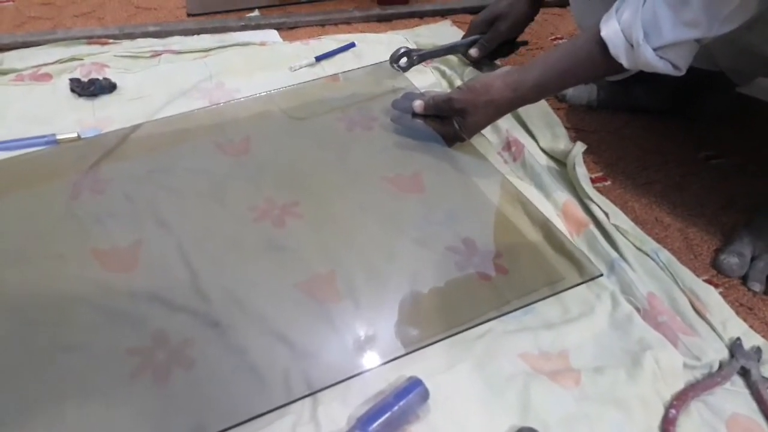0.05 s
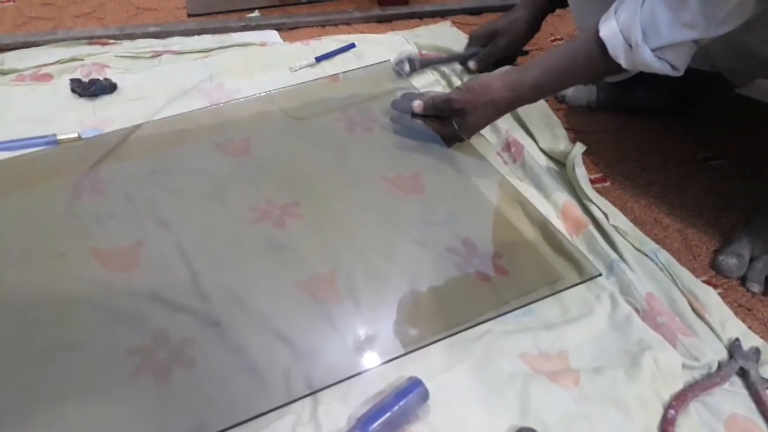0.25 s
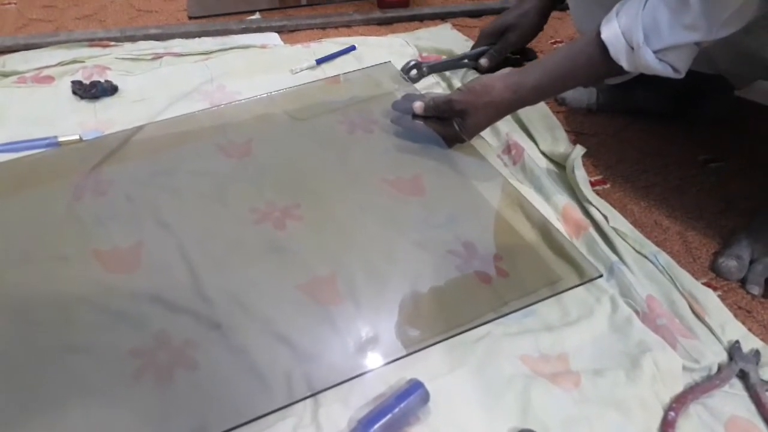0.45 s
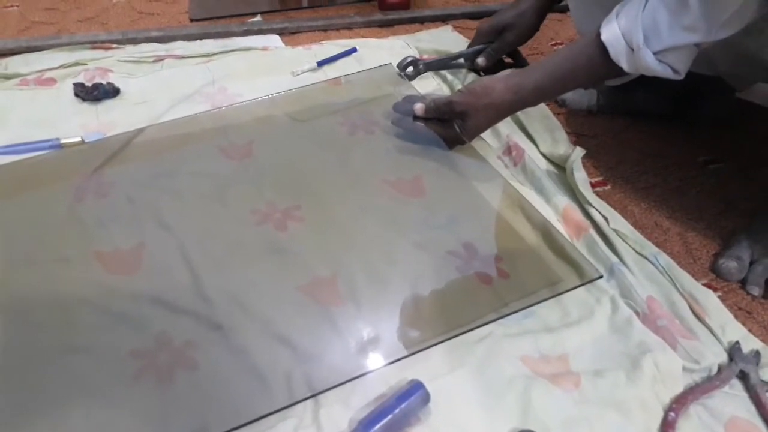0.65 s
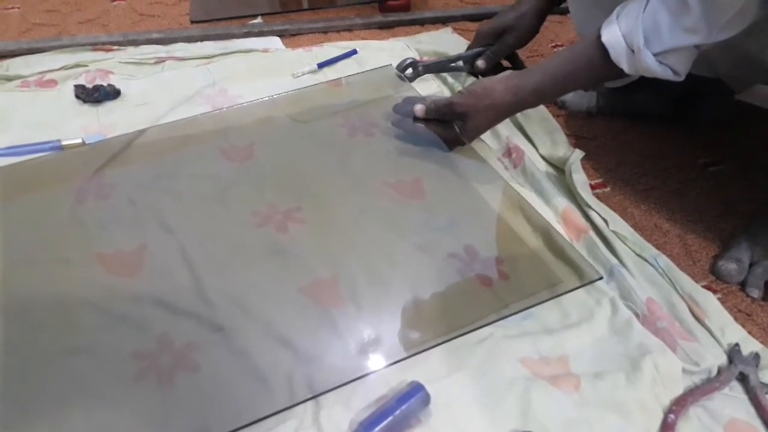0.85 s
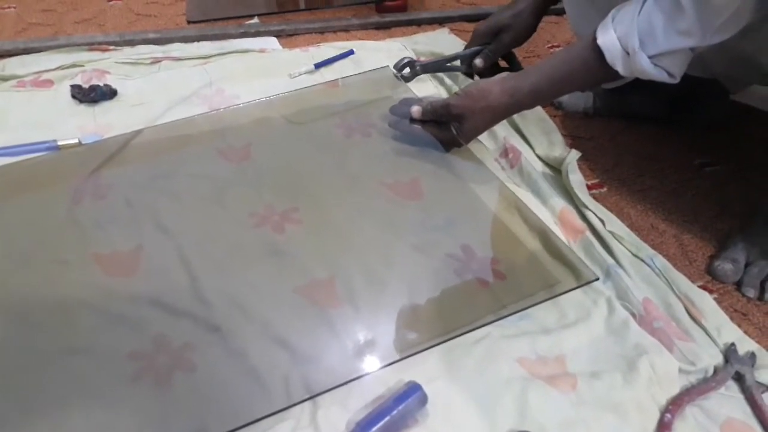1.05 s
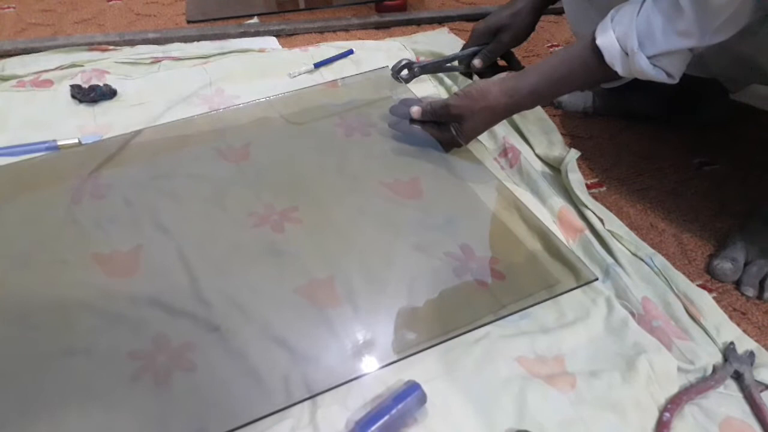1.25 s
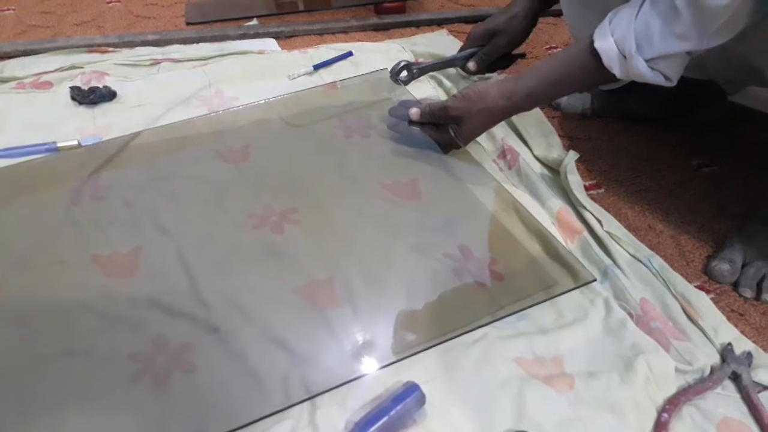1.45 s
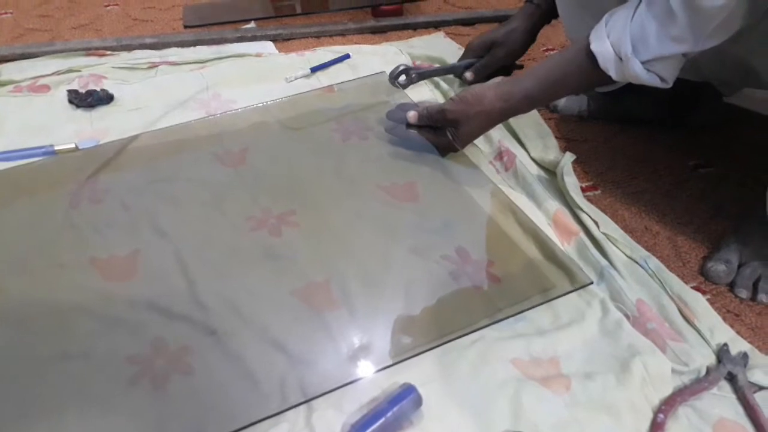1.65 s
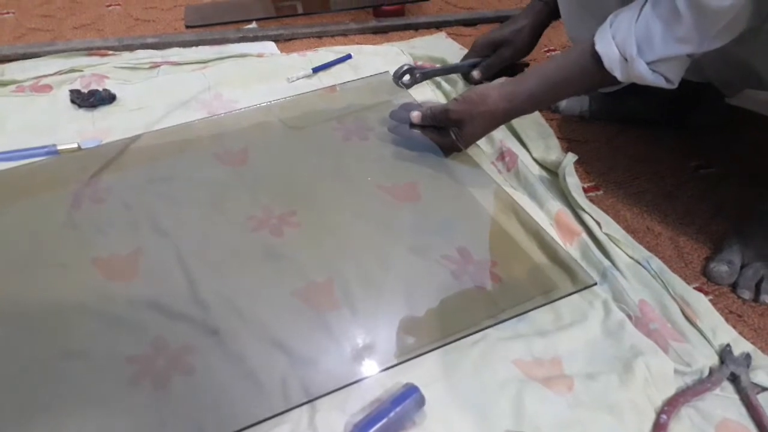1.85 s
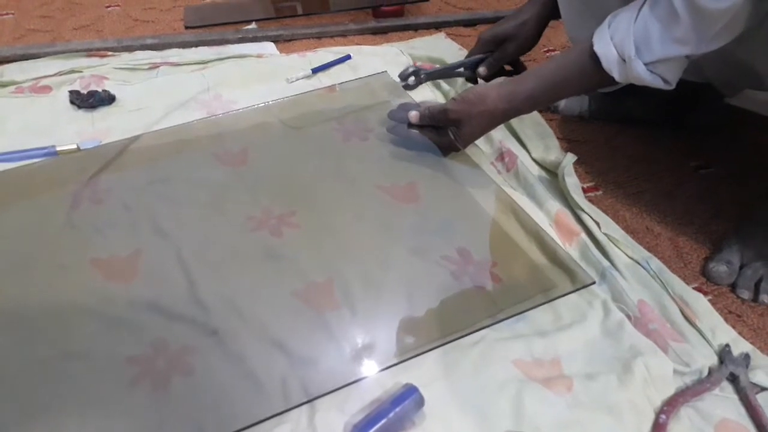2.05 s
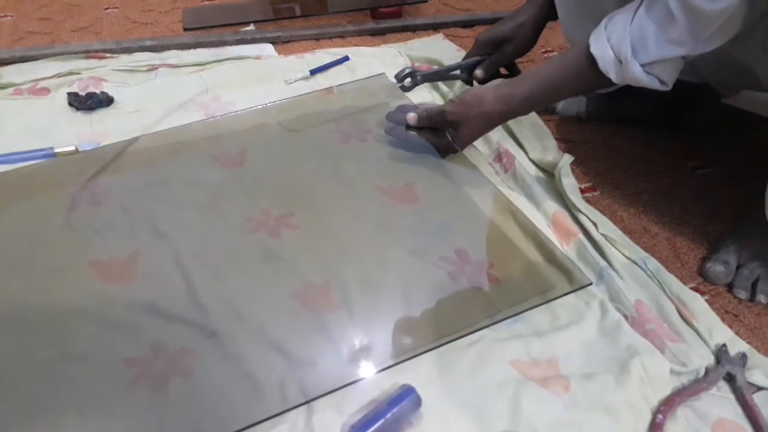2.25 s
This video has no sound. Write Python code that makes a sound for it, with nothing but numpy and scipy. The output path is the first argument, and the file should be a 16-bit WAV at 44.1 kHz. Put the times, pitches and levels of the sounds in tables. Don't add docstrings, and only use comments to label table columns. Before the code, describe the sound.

Hand pliers bite the edge of a glass sheet in a fast rattling burst ending in a hard knock, then sparse taps, then a second uneven burst; close microphone, walled yard echo, loudest peaks overloading.

```python
import sys
import numpy as np
from scipy import signal
from scipy.fft import rfft, irfft, next_fast_len
from scipy.io import wavfile
from scipy.ndimage import uniform_filter1d

SR = 44100
rng = np.random.default_rng(int(sys.argv[2]) if len(sys.argv) > 2 else 0)


def file_out(sig):
    cols = np.atleast_2d(sig).T
    lim = np.clip(cols, -1, 1)
    pcm = np.round(lim * 32767).astype(np.int16)
    wavfile.write(sys.argv[1], SR, pcm)


def amplitude_ratio(level_db):
    exponent = np.asarray(level_db, float) / 20
    return 10 ** exponent


N = 101429

# pitch_hz, level_db (per Hz)
SHEET_NOISE = [(24, -43), (40, -47), (277, -12), (354, -14.5), (968, -10.5), (1660, -11.5), (2780, -3),
               (12100, -27), (14000, -37)]
ATTACK_S = 0.0002


def evened(x):
    return x / np.sqrt(np.mean(x ** 2) + 1e-20)


def curve(points, hz):
    f, value = np.transpose(points)
    return np.interp(np.log(hz + 1), np.log(f + 1), value)


def over_time(points):
    return amplitude_ratio(np.interp(np.arange(N) / SR, *np.transpose(points)))


def add(mix, start_s, sound):
    part = mix[max(round(start_s * SR), 0):][:len(sound)]
    part += sound[:len(part)]


def noise(points, count, tilt_db=0):
    hz = np.fft.rfftfreq(count, 1 / SR)
    colour_db = curve(points, hz) + tilt_db * np.log2(hz / 2000 + 0.06)
    return evened(irfft(rfft(rng.standard_normal(count)) * amplitude_ratio(colour_db), count))


def ring(modes, extra_db, length_s, count, free=1):
    spread_db, detune, flutter_db = 3, 0.003, 2
    hz, db, t60 = np.array(modes, float).T[:, :, None]
    t = np.arange(count) / SR
    chance = rng.standard_normal((3, len(modes), 1))
    flutter_t = np.arange(24) * 0.00304
    wobbles = rng.standard_normal((len(modes), 24))
    flutter = np.array([np.interp(t, flutter_t, row, right=0) for row in wobbles])
    fade_db = 60 * np.maximum(t - length_s, 0) / (free * t60)
    level_db = db + extra_db(hz) + spread_db * chance[0] + flutter_db * flutter - fade_db
    tones = amplitude_ratio(level_db) * np.sin(2 * np.pi * hz * (1 + detune * chance[1]) * t + chance[2])
    return tones.sum(0) * np.minimum(t / ATTACK_S, 1) / np.linalg.norm(amplitude_ratio(db))


def chatter(sound, length_s):
    contacts_per_s, spread_db, first_db, fade_s = 900, 0.5, 0.5, 0.0061
    chance, uneven = rng.random((2, 2048))
    t = np.arange(2048) / SR
    taps = (chance < contacts_per_s / SR) * np.sign(uneven - 0.5)
    taps = taps * amplitude_ratio(-spread_db * abs(2 * uneven - 1)) * np.clip((length_s - t) / fade_s, 0, 1)
    taps[0] = amplitude_ratio(first_db)
    return signal.fftconvolve(sound, taps / np.linalg.norm(taps))


def background():
    # pitch_hz, level_db (per Hz)
    air_colour = [(15, -25.5), (25, -11.5), (382, -1.5), (1970, -15), (2440, -9.5), (3180, -11),
                  (5400, -20.5), (12600, -51.5), (14000, -49)]
    # time_s, level_db
    background_swell = [(0, 14), (.6, 0), (.88, -2), (1.1, 9.5), (1.9, 12), (2.3, 3.5)]
    # pitch_hz, level_db, width_hz
    hums = [(122, -69.5, 6.6)]
    t = np.arange(N) / SR
    out = amplitude_ratio(-63) * noise(air_colour, N)
    for hz, db, width_hz in hums:
        random_pair = rng.standard_normal(N) + 1j * rng.standard_normal(N)
        waver = signal.lfilter([1], [1, -np.exp(-np.pi * abs(width_hz) / SR)], random_pair)
        hum = (evened(abs(waver)) + 1) * np.exp(1j * (2 * np.pi * hz * t + np.angle(waver)))
        out = out + amplitude_ratio(db) * evened(hum.real)
    return out * over_time(background_swell)


def fidget():
    # pitch_hz, level_db (per Hz)
    hiss_colour = [(1000, -22), (5000, 8), (13000, -7)]
    # time_s, level_db
    hand_moves = [(0, -13), (.14, 14), (.7, 12), (0.899, -39.5), (.93, 3), (1.15, -15), (1.251, 19.5),
                  (2.3, 5)]
    return amplitude_ratio(-81) * over_time(hand_moves) * noise(hiss_colour, N)


def shake(tilt_db, length_s, count=8192, low_db=0):
    # pitch_hz, level_db, t60_s (time to fall 60 dB)
    sheet_modes = [(356.5, -13, 0.43), (684, -8.5, 0.24), (896, -15.5, 0.27), (1283, 0, 0.1),
                   (1568, -4.5, 0.28), (1700, 3, 0.14), (1895, -0.5, 0.15), (2005, -6.5, 0.22),
                   (2444, 5, 0.062), (2707, -2.5, 0.11), (3073, 3.5, 0.18), (3407, 5, 0.17),
                   (3890, 3, 0.15), (4033, 6, 0.051)]
    rustle_db, rustle_t60_s, rustle_rise_s, body_hz = 3.5, 0.082, 0.00037, 790
    t = np.arange(count) / SR
    rustle = amplitude_ratio(rustle_db - 60 * t / rustle_t60_s) * noise(SHEET_NOISE, count, tilt_db)
    rustle = rustle * np.minimum(t / rustle_rise_s, 1)
    tones = ring(sheet_modes, lambda hz: tilt_db * np.log2(hz / 2000), length_s / 2, count)
    sound = chatter(rustle, length_s)[:count] + tones
    hz = np.fft.rfftfreq(count, 1 / SR)
    return irfft(rfft(sound) * amplitude_ratio(low_db / (1 + (hz / body_hz) ** 2)), count)


def knock(db, length_s, tilt_db, low_db):
    return amplitude_ratio(db - 12.5) * shake(tilt_db, length_s, low_db=low_db)


def yard(x, count=3):
    # pitch_hz, t60_s
    echo_times = [(100, 0.76), (500, 0.46), (2500, 0.49), (5000, 0.39), (13000, 0.43)]
    # pitch_hz, level_db
    echo_colour = [(300, 0), (1500, -1.5), (2900, 0), (4500, 2), (9000, -2)]
    delay_s, fill_s, smear_hz, shifts_per_s = 0.008, 0.013, 40, 30
    drift = np.cumsum(rng.standard_normal(N)) * np.sqrt(2 * np.pi * smear_hz / SR)
    blur = np.exp(1j * uniform_filter1d(drift, size=40))
    blurred = (signal.hilbert(x, next_fast_len(N))[:N] * blur).real
    filling = 1 - np.exp(-np.arange(SR) / SR / fill_s)
    out = np.zeros(N)
    for k in range(count):
        taps = np.zeros(SR)
        at = np.arange(round(delay_s * SR), SR - 20, 20)
        taps[at + rng.integers(0, 20, len(at))] = rng.choice([-1., 1.], len(at))
        hz, t, z = signal.stft(taps * filling, SR, nperseg=256)
        fade_db = 60 * t / curve(echo_times, hz)[:, None]
        shaped = z * amplitude_ratio(curve(echo_colour, hz)[:, None] - fade_db)
        tail = signal.istft(shaped, SR, nperseg=256)[1]
        share = np.cos(np.pi * (np.arange(N) / SR * shifts_per_s + k / count)) * np.sqrt(2 / count)
        out += signal.fftconvolve(blurred * share, tail / np.linalg.norm(tail))[:N]
    return out


def bite(db, length_s, sheet_db, high_db, count=4096):
    # pitch_hz, level_db, t60_s
    tool_modes = [(1694, -18, .07), (2004, -20, .06), (2420, -14, .07), (3560, -13, .04), (4030, -13, .04),
                  (4190, 0, .045), (4433, -11, .04), (4627, -14, .035), (5006, -5, .04), (5163, -6, .045),
                  (5398, -4, .055), (6270, -14, .045), (7440, -24, .03), (8120, -25, .03)]
    # pitch_hz, level_db (per Hz)
    crack_colour = [(59, -52), (100, -30), (2520, -28.5), (3030, -19), (4220, 0), (5520, -8.5), (7080, -16),
                    (12400, -19), (14000, -23.5)]
    crack_db, crack_t60_s, snap_db, snap_t60_s = -2, 0.012, -0.5, 0.0017
    high_hz, top_hz, grip = 4800, 5800, 0.45
    t = np.arange(count) / SR
    length_s = min(length_s, 0.016)
    crack = amplitude_ratio(crack_db - 60 * t / crack_t60_s) * np.minimum(t / ATTACK_S, 1) * noise(crack_colour, count)
    crack = chatter(crack, length_s)[:count]
    snap = amplitude_ratio(snap_db - 60 * t / snap_t60_s) * noise(SHEET_NOISE, count)

    def high_modes(hz):
        return high_db * np.sign(hz - high_hz) * (hz < top_hz)

    steel = ring(tool_modes, high_modes, length_s, count, grip)
    loudness = amplitude_ratio(db - 12)
    glass = amplitude_ratio(sheet_db) * shake(0, length_s, count, low_db=-4)
    return loudness * (steel + crack + snap), loudness * glass


def single_note(db, hz, t60_s):
    t = np.arange(SR // 2) / SR
    return amplitude_ratio(db - 60 * t / t60_s) * np.minimum(t / 0.0027, 1) * np.sin(2 * np.pi * hz * t)


def scene():
    # (raises the modes from 4.8 to 5.8 kHz, lowers those below)
    bites = [(0.1415, -35.5, 0.012, -5, -4.5), (0.1507, -23.5, 0.008, -14.5, 0.5),
             (0.1714, -32, 0.02, -5, 6), (0.187, -21, 0.0069, -8.5, 5.5),
             (0.205, -5.5, 0.0071, -13.5, 1.5), (0.2278, -10.5, 0.0045, -10, 5.5),
             (0.244, -14, 0.008, -8.5, 8), (0.2525, -2.5, 0.012, -11, -3), (0.277, 3, 0.012, -17, -3),
             (0.2977, -7.5, 0.0089, -9.5, -2.5), (0.309, -11.5, 0.011, 2, 2.5),
             (0.3282, -0.5, 0.013, -10, 1.5), (0.344, -8.5, 0.0097, -2, 3),
             (0.369, -3, 0.0065, -14.5, 1.5), (0.3855, 1.5, 0.012, -18.5, 2),
             (0.407, -2, 0.0059, -12, 1.5), (0.42, -0.5, 0.0098, -12, 0),
             (0.428, -2, 0.013, -10.5, 3), (0.447, 2, 0.013, -13, -2.5),
             (0.4651, -9.5, 0.0082, 0, -5.5),
             (1.5391, -12, 0.0081, -8.5, 5), (1.568, -19.5, 0.0041, -10, 0),
                    (1.5817, -8, 0.007, -21, 4), (1.597, -13, 0.0098, -10, 2.5),
                    (1.6136, -12.5, 0.015, -30, 2.5), (1.6296, 2, 0.006, -12, 4.5),
                    (1.655, -6.5, 0.012, -15.5, 0.5), (1.673, -8, 0.0058, -8, 6),
                    (1.699, 1.5, 0.0069, -14, 2), (1.7092, 1.5, 0.008, -12, 4.5),
                    (1.7229, -6, 0.014, -6.5, 6.5), (1.7544, -2, 0.0094, -11, 0.5),
                    (1.776, -18.5, .008, -10, 3), (1.796, -10, 0.007, -9, 4),
                    (1.816, -15.5, 0.017, -6.5, 0), (1.9223, -19.5, 0.013, -17, 1),
                    (1.9466, -20.5, 0.015, -6.5, 4.5), (1.9905, 1, 0.0045, -17, 0),
                    (1.995, -11, 0.0075, -13.5, -4), (2.0056, -5, 0.0098, -12, -0.5),
                    (2.04, -25, 0.0033, -5, -8), (2.093, -22.5, 0.0084, -0.5, 2)]
    touches = [
        (1.029, -50, .008, -9, -3),
        (1.175, -45, .03, -1, 6),
        (1.37, -30, 0.017, 4.5, 3),
        (1.393, -25.5, 0.0091, -6, 0),
        (1.464, -32, .02, 4, -1),
    ]
    # start_s, level_db (peak), chatter_s, tilt_db (per octave), low_body_db
    knocks = [
        (0.0, -30, 0.02, -3, 0),
        (0.4487, -1.5, 0.0066, 0, 2.5),
        (0.479, -5.5, 0.018, -3.5, -13.5),
        (0.507, -16.5, .02, -4.5, -30),
        (0.541, -28, 0.018, -3, -15),
        (0.9144, -20, 0.0051, -3.5, -10),
        (1.043, -37.5, 0.019, -8.5, -3),
        (1.2201, -7, 0.0065, -4, -11.5),
        (1.713, -7, 0.0096, 4.5, 10),
        (2.007, -17.5, 0.0074, -4, -5),
    ]
    # start_s, level_db, pitch_hz, t60_s
    single_rings = [(0.2547, -26.5, 273, 0.08), (.4497, -27.5, 684, 0.067), (0.453, -30.5, 266, 0.026),
                    (0.9164, -41, 569, 0.27), (.9166, -34, 852, 0.093), (1.0574, -46, 365.7, 0.43),
                    (1.046, -44, 778, 0.19), (1.048, -47.5, 583, 0.13), (1.2515, -35, 355, 0.33),
                    (1.7099, -12, 2412, 0.099), (0.448, -8, 4170, 0.088), (.47, -23, 2707, 0.43),
                    (.47, -28.5, 3890, 0.36), (.47, -24.5, 2005, 0.35), (.47, -25, 3510, 0.42),
                    (.915, -35.5, 4060, 0.14), (.915, -41.5, 1903, 0.28), (0.916, -41, 1430, 0.19),
                    (1.22, -29, 1700, 0.17), (1.22, -30, 1895, 0.38), (1.22, -29, 5100, 0.054),
                    (1.22, -30, 2444, 0.27), (1.632, -22.5, 1685, .12)]
    steel, glass = np.zeros((2, N))
    for start_s, *how in bites + touches:
        steel_part, glass_part = bite(*how)
        add(steel, start_s, steel_part)
        add(glass, start_s, glass_part)
    for start_s, *how in knocks:
        add(glass, start_s, knock(*how))
    for start_s, *how in single_rings:
        add(glass, start_s, single_note(*how))
    work = steel + glass + amplitude_ratio(-3.5) * yard(amplitude_ratio(-7.5) * steel + glass)
    no_rumble = signal.butter(2, 84, "high", fs=SR, output="sos")
    work = signal.sosfilt(no_rumble, work)
    return np.tile(work + background() + fidget(), (2, 1))


def scatter(x):
    band_borders = [5500, 6400, 7800, 10000, 13300]
    hz, t, z = signal.stft(x, SR, nperseg=1024)
    band = np.searchsorted(band_borders, hz)
    on = rng.random((len(t) // 4 + 1, len(band_borders) + 1)) < 0.4
    on = on.repeat(4, 0)[:len(t)].T[band]
    on = on * ((band > 0) & (band < len(band_borders)))[:, None]
    side = uniform_filter1d(abs(z), 9, 0) * on * np.exp(2j * np.pi * rng.random(z.shape))
    return amplitude_ratio(-3) * signal.istft(side, SR, nperseg=1024)[1][:N]


def low_pass(x):
    return signal.sosfilt(signal.butter(12, 14240, fs=SR, output="sos"), x)


def record(dry):
    ceiling, skew, edge_hz = 0.86, 0.04, 13500
    x = np.clip(dry[0], -ceiling, ceiling)
    x = signal.lfilter([1, -1], [1, -np.exp(-2 * np.pi * 10 / SR)], x + skew * x ** 2)
    x = signal.oaconvolve(x, signal.firwin(255, edge_hz, window=("kaiser", 9), fs=SR), "same")
    side = scatter(x)
    return low_pass(np.array([x + side, x - side]))


dry = scene()
out = record(dry)
file_out(out)
```